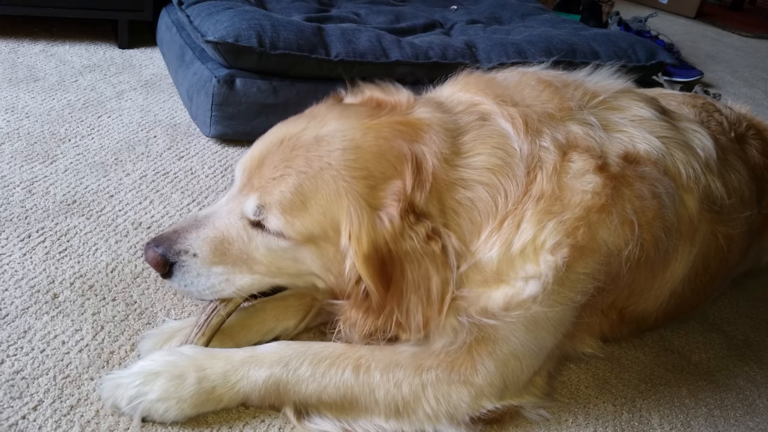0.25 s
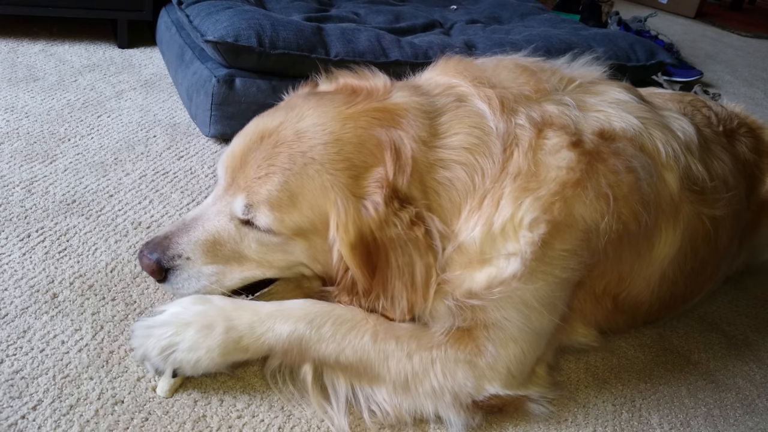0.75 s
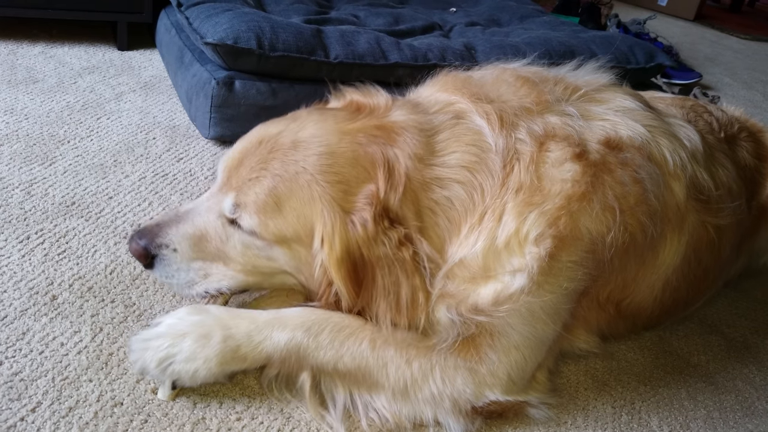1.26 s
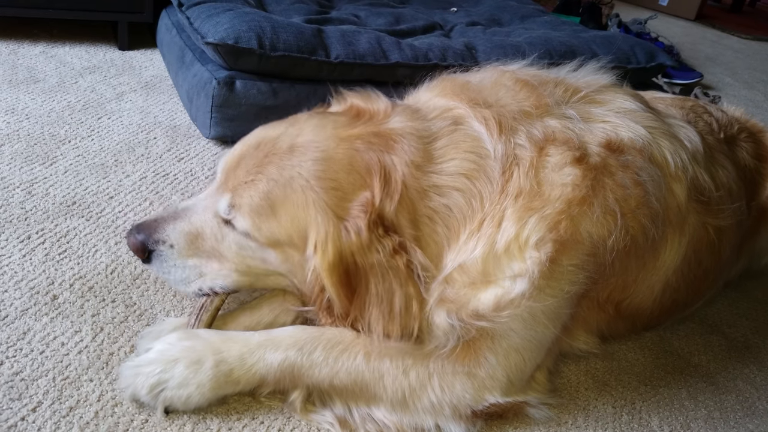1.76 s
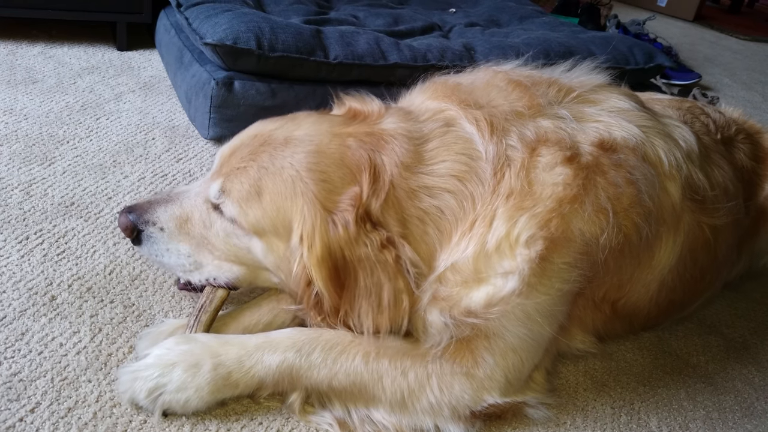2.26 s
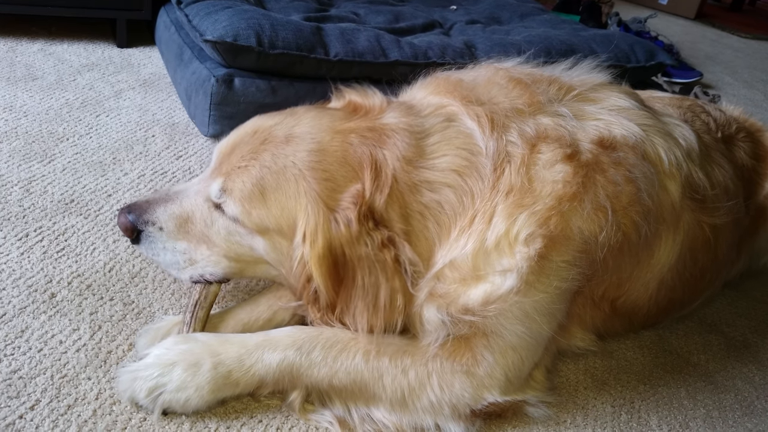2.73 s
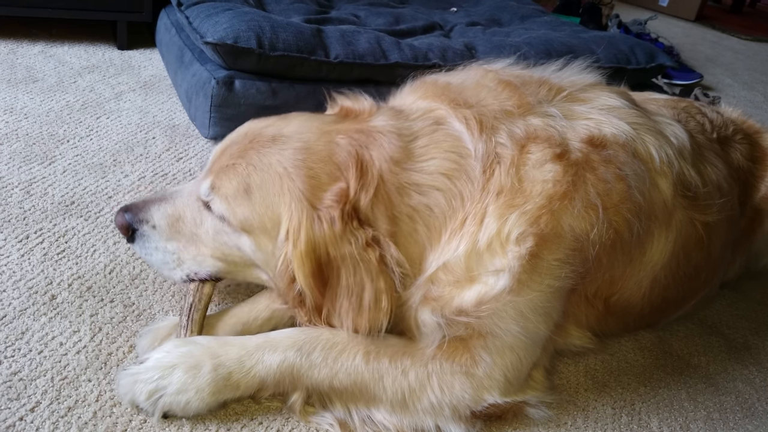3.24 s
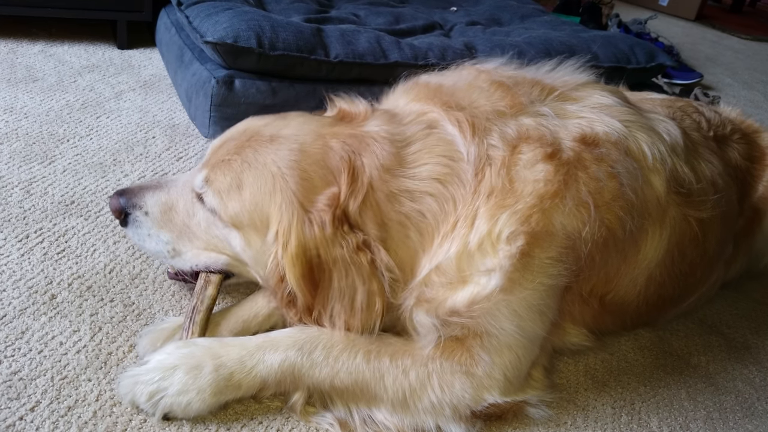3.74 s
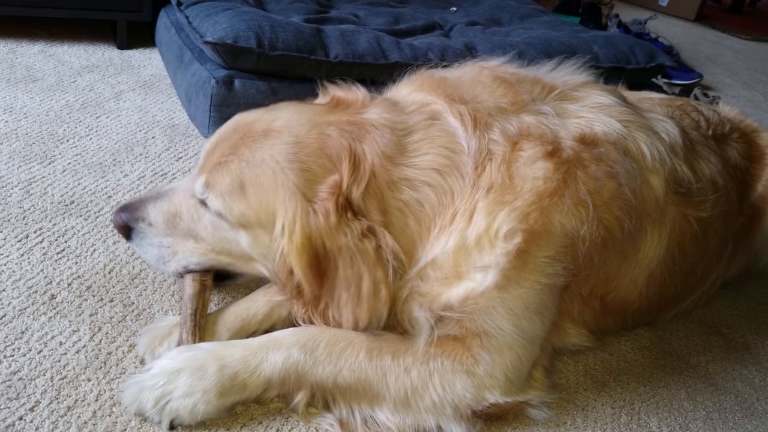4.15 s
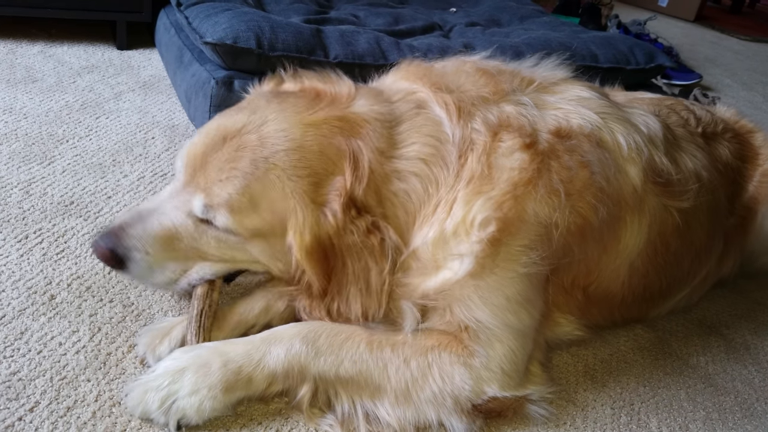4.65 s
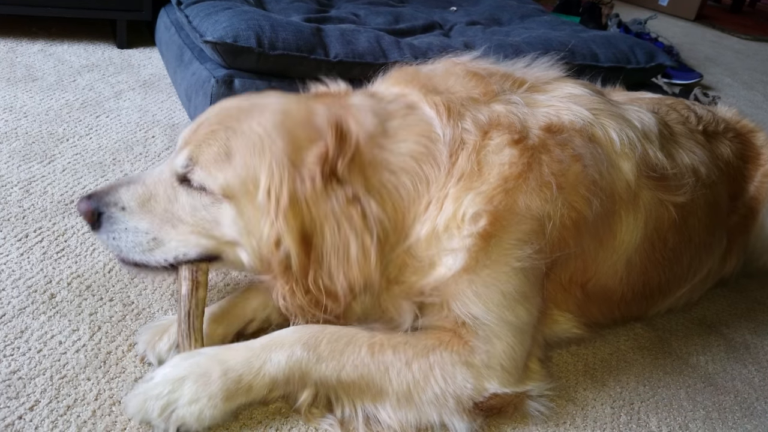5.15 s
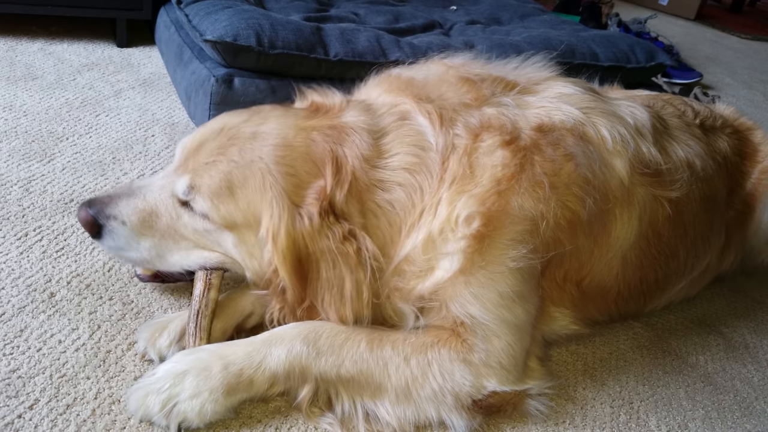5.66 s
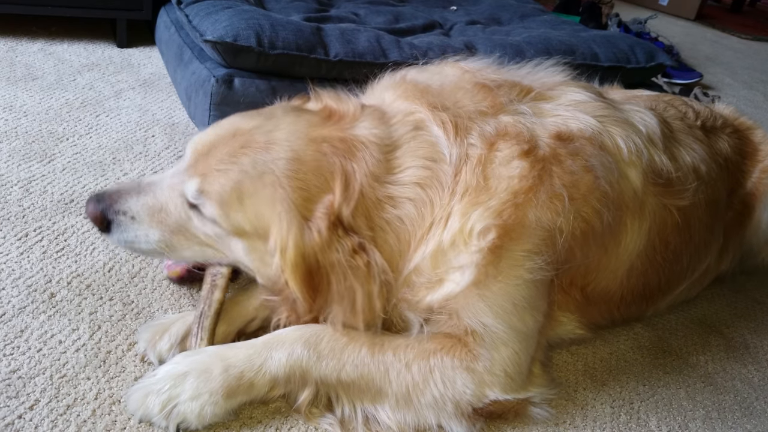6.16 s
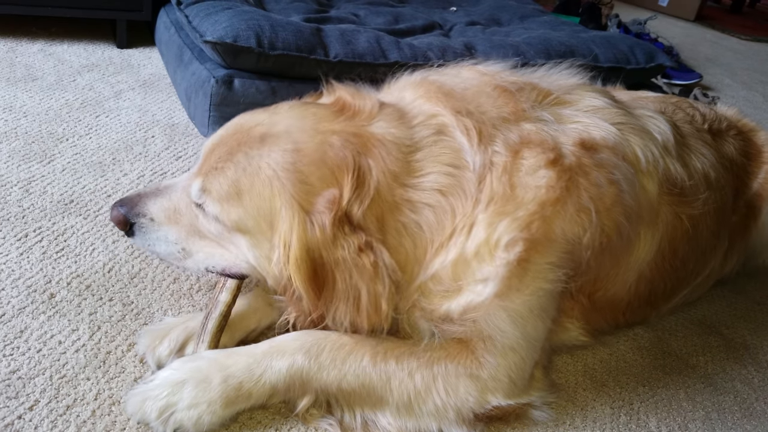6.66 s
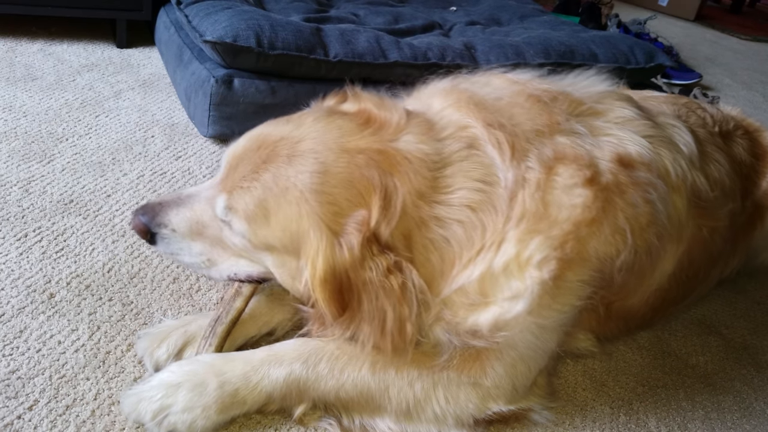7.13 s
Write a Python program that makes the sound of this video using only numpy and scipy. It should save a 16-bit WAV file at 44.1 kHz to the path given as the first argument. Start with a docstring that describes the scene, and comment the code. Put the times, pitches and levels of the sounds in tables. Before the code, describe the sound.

A dog gnaws an antler on a carpet in a quiet room. Scattered hollow knocks of teeth and muffled grinding lead to one loud, crunching crack about halfway, then the bites come faster. Faint wet lip sounds, rubbing fur and soft low bumps fall in between. An appliance hums in the background, under the light hiss of a close hand-held stereo microphone.

```python
"""Teeth knock, crunch and snap on an antler: a dog gnaws it on a carpet in a quiet room.
Each bite knocks the jaw, rings the antler and crumbles its surface; the back teeth grind.
Soft bumps come from the carpet and the hand-held stereo microphone. Fur rubs, and wet lips
slide twice a second in spells. Behind it an appliance hums and twice coasts with a sinking
whoosh, over room rumble and microphone hiss."""
import sys
import numpy as np
from scipy import signal
from scipy.fft import rfft, irfft
from scipy.io import wavfile

SR = 44100
rng = np.random.default_rng(int(sys.argv[2]) if len(sys.argv) > 2 else 0)


def file_out(sig):
    """Save sig as 16-bit WAV at sys.argv[1]."""
    # one column per channel
    cols = np.atleast_2d(sig).T
    # limit, then scale
    lim = np.clip(cols, -1, 1)
    pcm = np.round(lim * 32767).astype(np.int16)
    wavfile.write(sys.argv[1], SR, pcm)


N = 326340
T = np.arange(N) / SR
FREQS = np.maximum(np.fft.rfftfreq(N, 1 / SR), 1)


# bites: t/s, knock/dB, knock f/Hz, antler/dB, crunch/dB, snap/dB, slip offset/s (negative: early)
BITES = [(0.064, -31, 290, -34.5, -57, -46, 0.0081), (1.251, -27, 750, -29.5, -54, -45.5, -0.0027),
         (1.748, -21.5, 684, -27.5, -40, -46.5, 0.0086), (2.231, -35, 290, -34, -66, -59, .003),
         (2.761, -31.5, 720, -45, -66, -58, 0.0092), (3.25, -34, 390, -29.5, -52, -51, 0.0094),
         (3.304, -29.5, 690, -35, -62, -63, -0.0028), (3.947, -7, 694, -21, -26.5, -23, 0.012),
         (4.535, -52, 240, -35.5, -61, -62, .003), (4.599, -39, 710, -39.5, -62, -62, -0.0082),
         (4.933, -29.5, 328, -35, -64, -55, .002), (5.15, -15.5, 330, -29, -34, -33, -.005),
         (5.248, -17, 272, -20, -23.5, -27.5, 0.00016), (5.423, -36.5, 437, -37.5, -65, -54, .003),
         (5.555, -36.5, 243, -51, -64, -44.5, -0.000071), (5.652, -30.5, 250, -35, -63, -62, .003),
         (5.811, -23, 307, -28, -38.5, -38, -0.0025), (5.932, -20, 332, -29.5, -37, -37.5, -.012),
         (6.319, -23.5, 335, -32.5, -57, -49, -0.00061), (6.387, -18.5, 303, -23.5, -36.5, -44.5, 0.013),
         (6.49, -15, 333, -26, -38, -52, 0.00079), (6.565, -27, 310, -34, -41.5, -47, -0.0013),
         (6.912, -23, 328, -31.5, -53, -61, 0.013), (7.077, -32, 294, -38.5, -64, -64, -0.003),
         (7.185, -16, 321, -21, -38, -45, 0.012), (7.243, -23, 384, -24.5, -38.5, -44, -0.0012),
         (7.307, -29, 287, -31, -38, -50, 0.0024)]
# modes of the antler clamped in the jaw: f/Hz, t60/s, level/dB
ANTLER_MODES = [(226, 0.021, -2), (453.5, 0.013, 2), (641, 0.009, 1), (808, 0.02, -4.5), (1012, 0.014, -6),
                (1495, 0.049, -26), (1610, 0.014, -19.5), (2180, 0.011, -18), (3550, 0.02, -34)]
# spectrum of the crumbling surface: f/Hz, level/dB
CRUNCH_SPECTRUM = [(500, -29), (1200, 6), (1650, 12.5), (2300, 13.5), (2850, 19.5), (3700, 5.5),
                   (4500, -7.5), (5900, -21.5), (7500, -19), (16000, -35)]

def teeth(knock_db=-1.5, antler_db=3, crunch_db=-1, t60_cycles=7.4, give_s=0.00064, tip_ratio=1.233):
    """Each bite and its lighter slip crumble the surface, then knock the jaw and ring the antler."""
    knocks, crunch = np.zeros((2, N))
    for s, db, hz, ring_db, grit_db, _, slip_s in BITES:
        slip = undb(-8 - 0.3159 * max(db + 23, 0))  # relatively weaker in hard bites
        for at, force, pitch in ((s, 1, hz), (s + slip_s, slip, tip_ratio * hz)):
            knock = ring(pitch, t60_cycles / pitch, rise=0.002, size=4096)
            add(knocks, at + give_s, force * undb(db + knock_db) * knock)
            for mode_hz, t60, mode_db in ANTLER_MODES:
                detune, spread_db = rng.standard_normal(2)  # the tooth lands somewhere else each time
                mode = ring(mode_hz * (1 + .035 * detune), t60, rise=0.0018, size=2048)
                gain = force * undb(ring_db + antler_db + mode_db + spread_db)
                add(knocks, at + give_s, gain * mode)
            add(crunch, at, force * undb(grit_db + crunch_db) * fracture(t60=0.022, crumbs_db=-7.5))
    return knocks + tint(crunch, CRUNCH_SPECTRUM)


def fracture(t60, crumbs_db, rise=0.0015, rough_db=3, size=4410):
    """A main crack and a trail of crumbs: tiny breaks of uneven size."""
    grain, spread = rng.standard_normal((2, size))
    break_sizes = np.repeat(undb(rough_db * np.clip(spread[::10], -2, 2)), 10)
    envelope = fade(t60, rise, size) + undb(crumbs_db) * fade(.05, rise, size)
    burst = envelope * unit(grain * break_sizes)
    bounce_samples = rng.integers(6, 40)  # an echo in the mouth colours each crack differently
    return burst + 0.19 * np.roll(burst, bounce_samples)


# spectrum of snapping chips: f/Hz, level/dB
SNAP_SPECTRUM = [(3000, -16), (6000, -11.5), (8000, -17.5), (9700, -5.5), (11300, -7.5), (13500, 7.5),
                 (14200, -1.5), (15000, -16), (16000, 2)]

def snaps():
    """One chip breaks off per bite, where the tooth first catches."""
    out = np.zeros(N)
    for s, *_, snap_db, slip_s in BITES:
        add(out, s + min(slip_s, 0), undb(snap_db) * fracture(t60=0.02, crumbs_db=-12.5))
    return tint(out, SNAP_SPECTRUM)


# lingering tones: t/s, f/Hz, t60/s, level/dB
AFTER_RINGS = [(3.307, 748, 0.099, -44), (3.947, 3800, 0.035, -41), (3.947, 270, 0.05, -27),
               (3.951, 764, 0.53, -34), (3.951, 775, 0.3, -40), (5.935, 860, 0.16, -39.5),
               (6.386, 3750, 0.03, -46), (7.19, 1065, 0.43, -43)]

def after_rings():
    """A few hard bites ring on; close tones beat."""
    out = np.zeros(N)
    for s, hz, t60, db in AFTER_RINGS:
        add(out, s, undb(db) * ring(hz, t60, rise=0.0088))
    return out


# grinds along the antler: centre t/s, length/s, level/dB
GRINDS = [(1.2, 0.15, -42.5), (1.65, 0.067, -44), (2.78, 0.34, -43.5), (3.12, 0.14, -46.5),
          (4.22, 0.034, -42.5), (4.85, 0.17, -41.5), (6.65, 0.25, -46.5), (7.35, .07, -35)]
# grinding spectrum, muffled by the cheeks: f/Hz, level/dB
GRIND_SPECTRUM = [(50, 3), (110, 6), (300, -2), (500, -5), (850, -20), (1300, -28), (4000, -49)]

def grinding(gain_db=-2):
    """The back teeth stick and slip quickly under pressure."""
    return undb(gain_db) * swells(GRINDS) * tint(catches(per_s=450), GRIND_SPECTRUM)


# soft bumps: t/s, level/dB, f/Hz
BUMPS = [(0.029, -26.5, 64), (0.371, -32, 80.5), (1.824, -18, 83.4), (2.153, -28.5, 74.6),
         (2.712, -26, 83.6), (2.918, -31.5, 132), (3.082, -25.5, 90.5), (3.338, -30, 92),
         (4.079, -28.5, 67), (5.018, -28, 74.5), (5.673, -29.5, 97), (6.28, -28, 94.2), (6.602, -31, 78),
         (6.669, -28, 69.2)]

def bumps(gain_db=2.5, right_db=-25):
    """Soft pushes on carpet and microphone give low thuds, mainly in the left port."""
    out = np.zeros(N)
    for s, db, hz in BUMPS:
        thud = ring(hz, t60=0.05, rise=0.051)
        overtone = undb(-8) * ring(1.68 * hz, t60=0.045, rise=0.0098)
        add(out, s, undb(db + gain_db) * (thud + overtone))
    return np.array([out, undb(right_db) * out])


# shifts of head and paws on the carpet: centre t/s, length/s, level/dB
SHIFTS = [(0.03, .18, -42), (1.42, 0.87, -45.5), (4.42, 0.33, -42), (4.82, 0.33, -42), (7.25, 0.31, -41.5)]
# rubbing spectrum: f/Hz, level/dB
RUB_SPECTRUM = [(60, -7), (150, -10), (330, 3.5), (600, -8), (900, -10), (1400, -19.5), (2500, -23),
                (6000, -40)]

def rubbing(gain_db=-8, rest_db=-52.5, catch_db=-13):
    """Uneven fur friction with small catches of the teeth; it swells when the dog shifts."""
    friction = noise() * undb(2 * drift(34)) + undb(catch_db) * catches(per_s=40)
    envelope = undb(rest_db) + swells(SHIFTS)
    return undb(gain_db) * envelope * tint(friction, RUB_SPECTRUM)


# spells of lip strokes: first t/s, end t/s, level/dB
LIP_SPELLS = [(0.605, 3.85, -60.5), (4.79, 5.0, -58.5), (5.71, 5.95, -64), (7.32, 7.4, -66)]
# spectrum of wet lips: f/Hz, level/dB
LIP_SPECTRUM = [(7000, -34), (9700, -17), (11200, -5), (12600, 0), (14000, -.5), (16000, -8)]

def lips(period_s=.499, stroke_s=.13, gain_db=-2, pop_db=-4, ragged_db=2, tick_db=-80):
    """Saliva fizzes and pops as the lips slide along the antler; stray wet ticks fall in between."""
    strokes = [(s, stroke_s, db) for first, end, db in LIP_SPELLS
               for s in np.arange(first, end, period_s)]
    flicker = undb(ragged_db * drift(22))
    fizz = flicker * (noise() + undb(pop_db) * catches(per_s=110))
    ticks = undb(tick_db) * catches(per_s=8)
    return tint(undb(gain_db) * swells(strokes) * fizz + ticks, LIP_SPECTRUM)


# appliance coasts: t/s, whoosh level/dB
COASTS = [(0.76, -50), (4.11, -50.5)]

def whoosh(start_hz=450, sink_s=.75, width_hz=65, upper_db=-6):
    """As the appliance coasts, a noise band glides down with a weaker one about three times higher."""
    out = np.zeros(N)
    for s, db in COASTS:
        centre_hz = start_hz * np.exp(-np.maximum(T - s, 0) / sink_s)
        phase = 2 * np.pi * np.cumsum(centre_hz) / SR
        lower = drift(width_hz) * np.sin(phase) + drift(width_hz) * np.cos(phase)
        upper = drift(9.4 * width_hz) * np.sin(2.9 * phase) + drift(3.4 * width_hz) * np.cos(3.2 * phase)
        envelope = trapezoid(s, attack_s=0.28, length_s=1.055, release_s=0.19) ** 2
        out += undb(db) * envelope * (lower + undb(upper_db) * upper)
    return out


# appliance hum lines: f/Hz, level/dB
HUM_LINES = [(91.3, -48), (120, -54), (183, -58), (204.8, -59), (241, -59), (360.5, -64.5)]

def hum(whine_hz=408, whine_db=-49.5, dip_db=-9.5, lead_s=0.29):
    """Shaft, mains and blade tones; the whine dips at each coast, starting ahead of the whoosh."""
    coasting = sum(trapezoid(s - lead_s, attack_s=0.6, length_s=1.91, release_s=0.22) for s, _ in COASTS)
    drone = sum(undb(db) * motor_tone(hz) for hz, db in HUM_LINES)
    whine = undb(whine_db + dip_db * coasting) * motor_tone(whine_hz)
    balance = undb([[-.5], [.5]])
    return balance * (drone + whine)


def motor_tone(hz, waver_hz=0.702):
    """A slightly wavering motor line; rms 1."""
    return np.sqrt(2) * np.sin(2 * np.pi * np.cumsum(hz + waver_hz * drift(4.3)) / SR)


# room rumble: f/Hz, density/(dB re 1/Hz)
RUMBLE_SPECTRUM = [(20, -103), (60, -69.5), (95, -72), (145, -79.5), (225, -77), (300, -96), (450, -84),
                   (900, -89), (1500, -108), (4000, -115)]
# hiss of either port: f/Hz, density/(dB re 1/Hz)
HISS_SPECTRUM = [(25, -95), (100, -78.5), (300, -81.5), (900, -84), (1600, -95), (2600, -100), (4000, -107),
                 (7600, -114), (10000, -108), (12500, -102), (15500, -99)]
# humps in the left hiss: f/Hz, width/Hz, density/(dB re 1/Hz)
LEFT_HUMPS = [(30, 200, -73.5), (1137, 760, -84.5), (2344, 920, -87), (3390, 720, -93.5),
              (4774, 1125, -88.5), (5370, 1970, -95.5)]

def noise_floor():
    """Room rumble common to both channels, and separate hiss in each microphone port."""
    humps = sum(undb(db) * np.exp(-(2 * (FREQS - hz) / width) ** 2) for hz, width, db in LEFT_HUMPS)
    left = colour(noise(), np.hypot(shape(HISS_SPECTRUM), humps))
    right = colour(noise(), shape(HISS_SPECTRUM))
    rumble = colour(noise(), shape(RUMBLE_SPECTRUM))
    return np.sqrt(SR / 2) * (rumble + np.array([left, right]))


# spectrum of the room's echoes: f/Hz, level/dB
ECHO_SPECTRUM = [(80, 11.5), (250, -0.5), (500, -3.5), (800, 1), (1200, -5), (2000, -1), (3000, -6.5),
                 (6000, 7), (14000, 0.5)]

def room(x, gain_db=-11, side_db=-5):
    """Short, soft stereo reverberation of a furnished room."""
    send = colour(x, shape(ECHO_SPECTRUM))
    mid, side = (signal.fftconvolve(send, reflections())[:N] for _ in range(2))
    return undb(gain_db) * (mid + undb(side_db) * np.array([side, -side]))


def reflections(low_t60_s=0.49, treble_t60_s=0.19, crossover_hz=2600):
    """Dense echoes from floor and furniture; the carpet takes the treble first."""
    low = 1 / (1 + (FREQS / crossover_hz) ** 4)
    tail = sum(colour(noise(), band)[:SR // 2] * fade(t60, rise=0.0045)
               for band, t60 in ((low, low_t60_s), (1 - low, treble_t60_s)))
    return tail / np.sqrt(np.sum(tail ** 2))


def ports(x, lag_s=0.00018):
    """The two microphone ports colour the dog in opposite ways; the right hears it later."""
    tilt = np.sqrt(shape([(300, 0.5), (2000, -5.0), (6000, 6.0), (12000, -12.0)]))
    delay = np.exp(-2j * np.pi * FREQS * lag_s)
    return np.array([colour(x, tilt), colour(x, delay / tilt)])


def undb(db):
    """Decibels to gain."""
    return 10 ** (np.asarray(db) / 20)


def unit(x):
    """Scale to rms 1."""
    return x / np.sqrt(np.mean(x ** 2))


def shape(points):
    """Gain per frequency from (f/Hz, level/dB) points."""
    hz, db = np.transpose(points)
    return undb(np.interp(np.log(FREQS), np.log(hz), db))


def colour(x, gain):
    """Filter by a gain per frequency."""
    return irfft(rfft(x) * gain, N)


def tint(x, points):
    """Colour a white signal at constant power."""
    return colour(x, unit(shape(points)))


def noise():
    """White noise; rms 1."""
    return rng.standard_normal(N)


def drift(rate_hz):
    """Smooth random drift; rms 1."""
    return unit(colour(noise(), np.exp(-(FREQS / rate_hz) ** 2)))


def catches(per_s):
    """Tiny slips at random moments; rms 1."""
    return unit((rng.random(N) < per_s / SR) * noise())


def swells(rows):
    """Gaussian swells from (centre t/s, length/s, level/dB) rows."""
    return sum(undb(db) * np.exp(-(2 * (T - s) / length) ** 2) for s, length, db in rows)


def trapezoid(s, attack_s, length_s, release_s):
    """Attack, hold and release from time s, all within length_s; peak 1."""
    return np.clip(np.minimum((T - s) / attack_s, (s + length_s - T) / release_s), 0, 1)


def fade(t60, rise, size=SR // 2):
    """Envelope that builds over rise seconds and dies away; peak 1."""
    t = T[:size]
    envelope = (1 - np.exp(-(t / rise) ** 2)) * np.exp(-np.log(1000) * t / t60)
    return envelope / envelope.max()


def ring(hz, t60, rise, size=SR // 2):
    """One damped mode."""
    return fade(t60, rise, size) * np.sin(2 * np.pi * hz * T[:size])


def add(track, s, sound):
    """Mix a sound into a track from time s on."""
    i = int(np.clip(s * SR, 0, N - 1))
    track[i:i + len(sound)] += sound[:N - i]


def scene():
    """The gnawing dog in its room, over the appliance and the noise floor."""
    dog = teeth() + snaps() + grinding() + rubbing() + lips()
    background = whoosh() + hum() + noise_floor()
    return ports(dog + after_rings()) + room(dog) + bumps() + background


def record(dry, cutoff_hz=15750):
    """A steep low-pass cuts the top."""
    return signal.sosfilt(signal.ellip(10, .2, 80, cutoff_hz, fs=SR, output="sos"), dry)


dry = scene()
out = record(dry)
file_out(out)
```